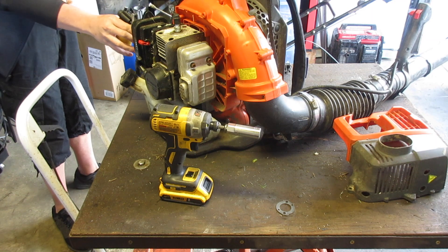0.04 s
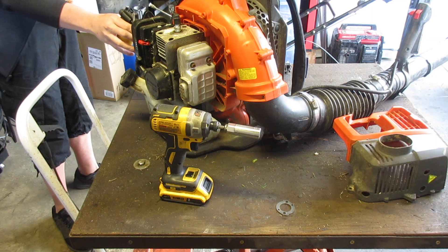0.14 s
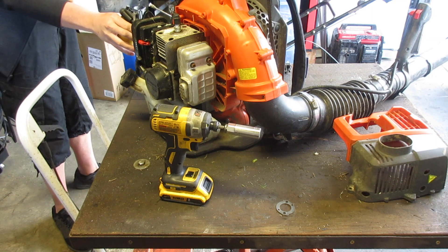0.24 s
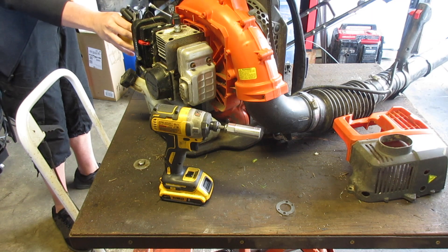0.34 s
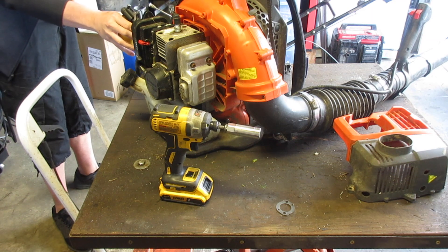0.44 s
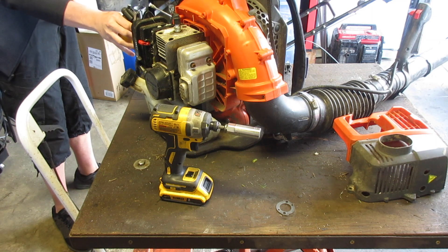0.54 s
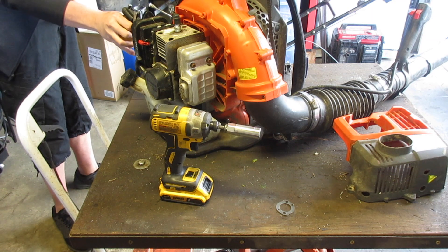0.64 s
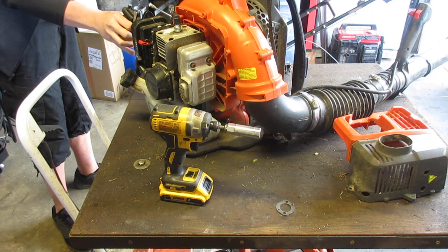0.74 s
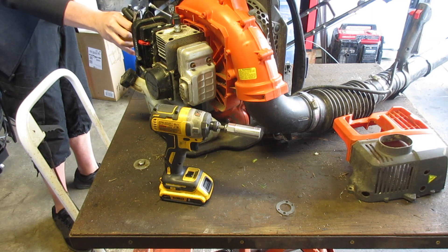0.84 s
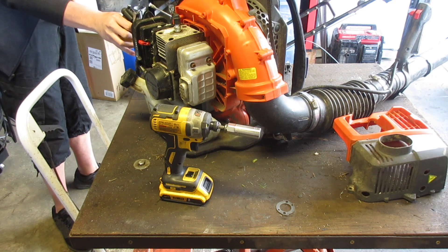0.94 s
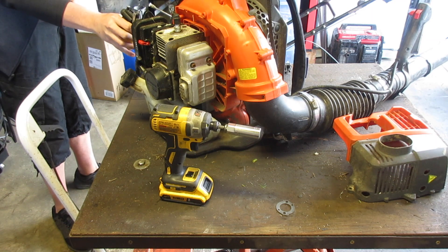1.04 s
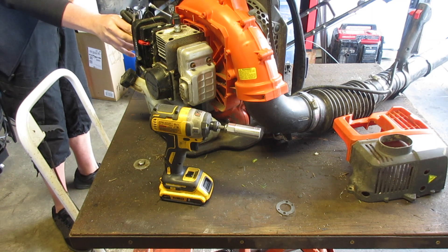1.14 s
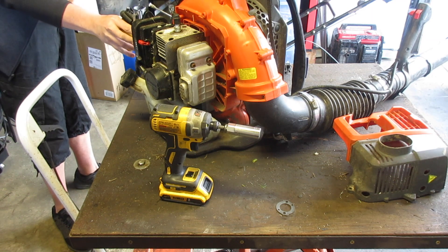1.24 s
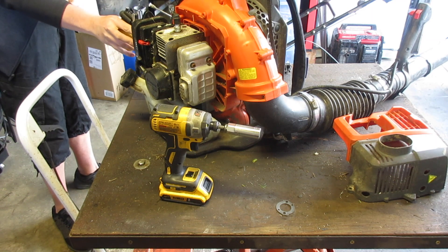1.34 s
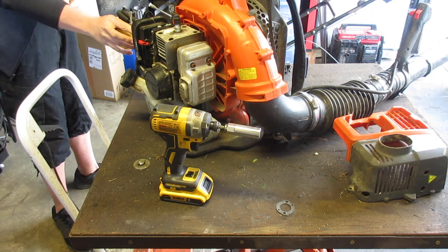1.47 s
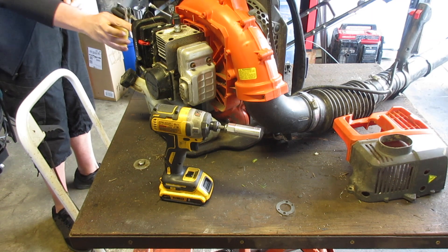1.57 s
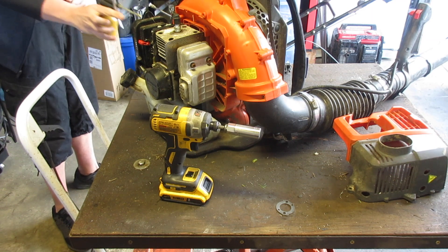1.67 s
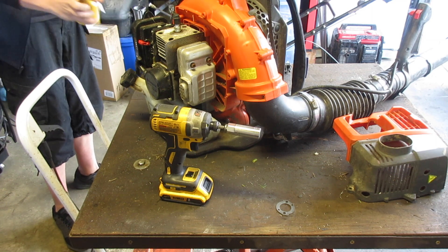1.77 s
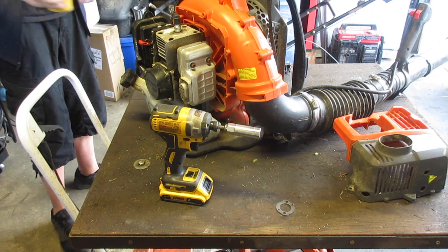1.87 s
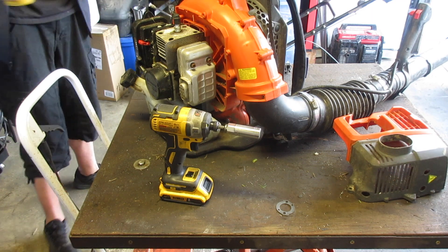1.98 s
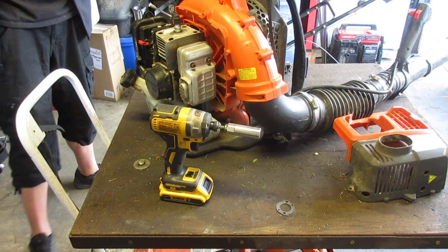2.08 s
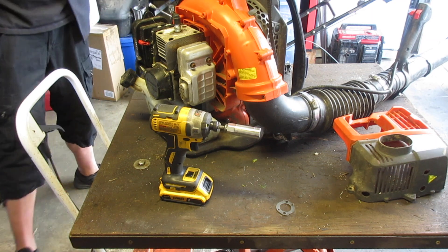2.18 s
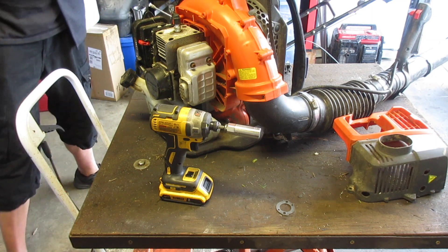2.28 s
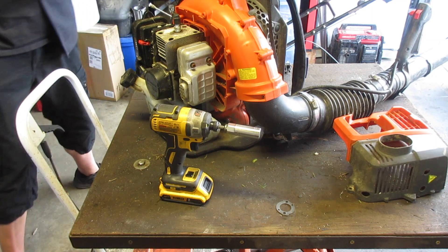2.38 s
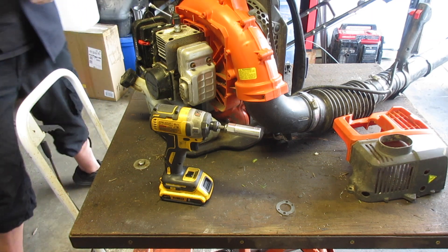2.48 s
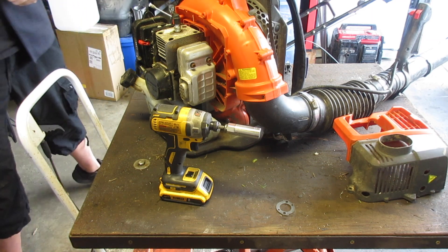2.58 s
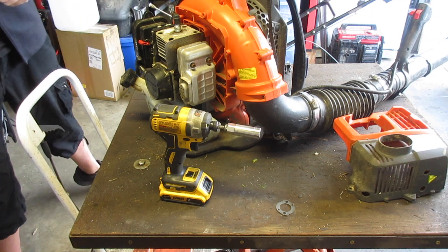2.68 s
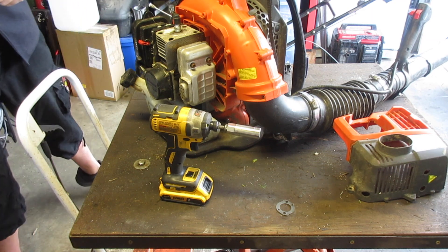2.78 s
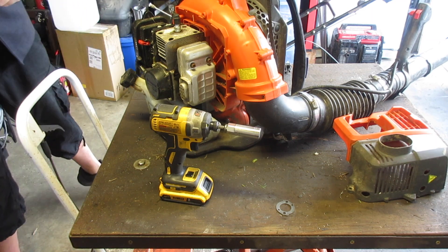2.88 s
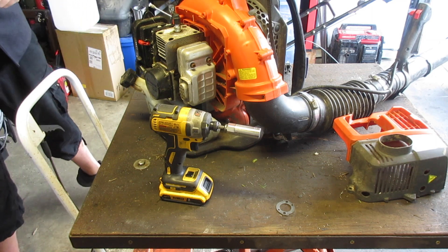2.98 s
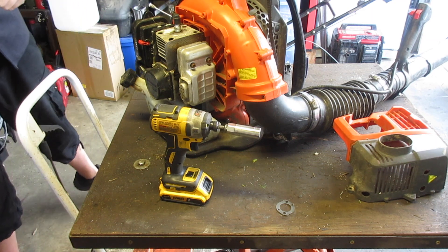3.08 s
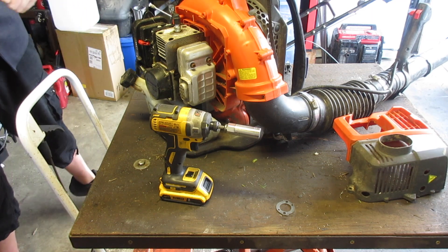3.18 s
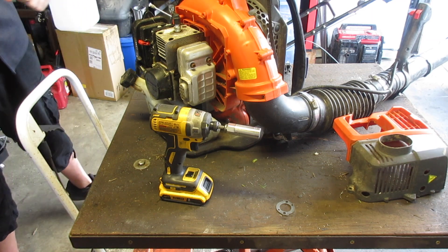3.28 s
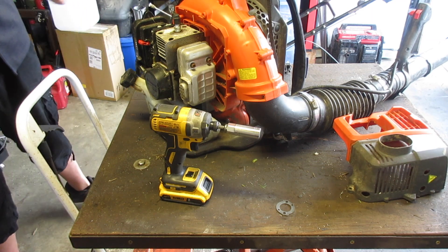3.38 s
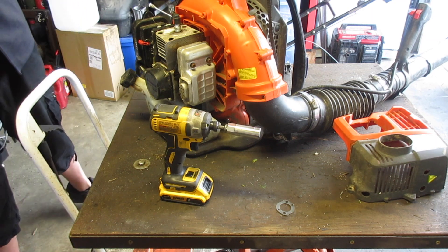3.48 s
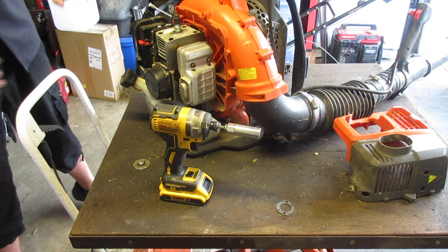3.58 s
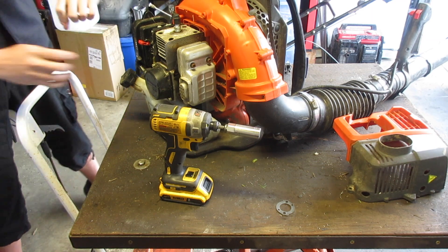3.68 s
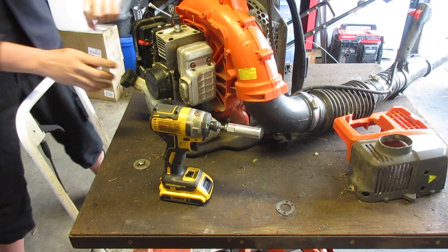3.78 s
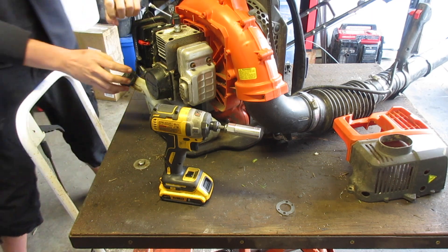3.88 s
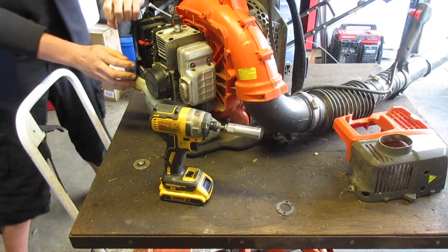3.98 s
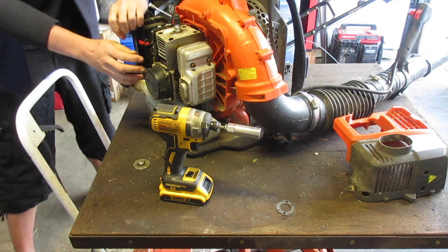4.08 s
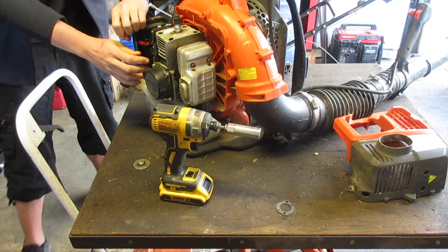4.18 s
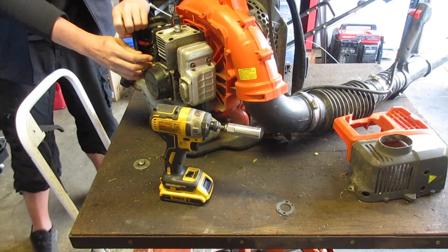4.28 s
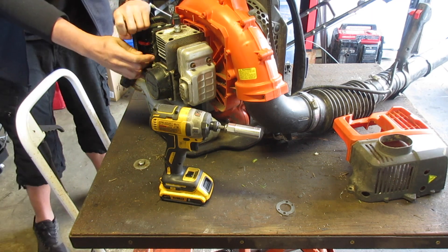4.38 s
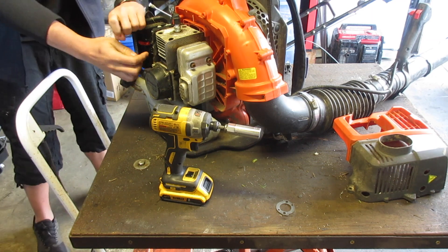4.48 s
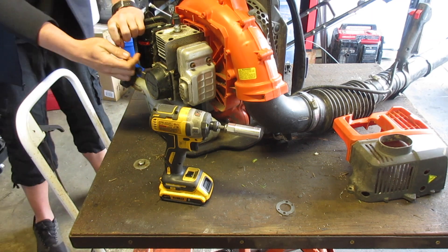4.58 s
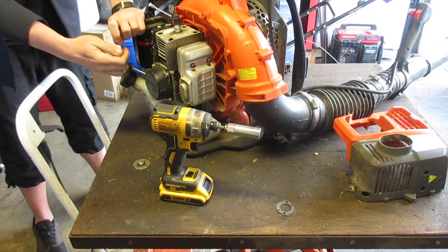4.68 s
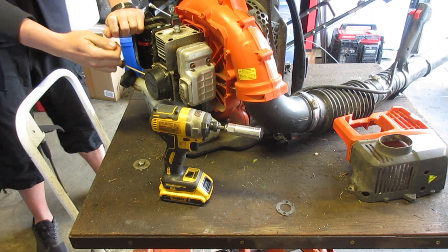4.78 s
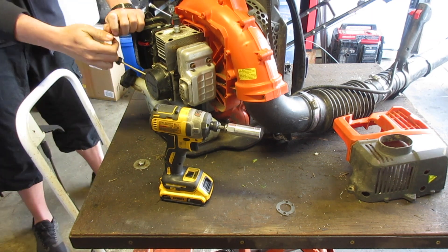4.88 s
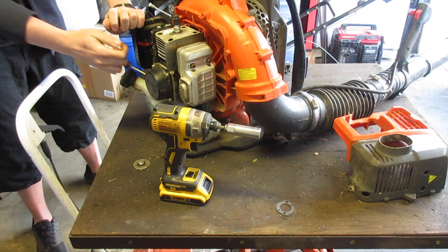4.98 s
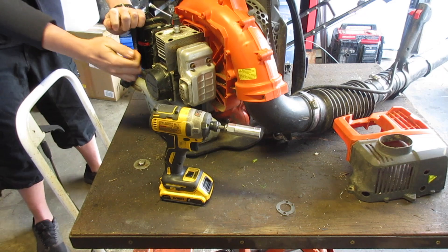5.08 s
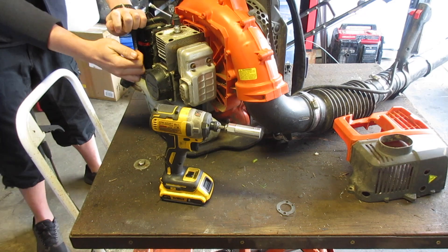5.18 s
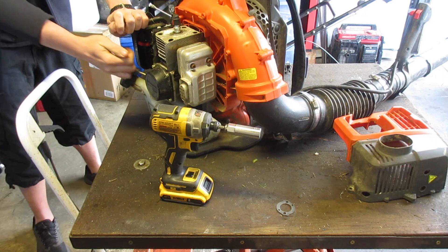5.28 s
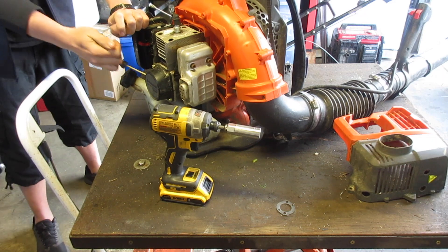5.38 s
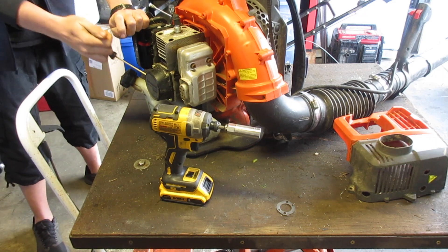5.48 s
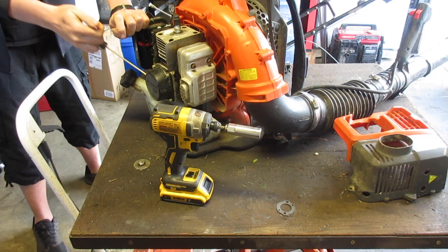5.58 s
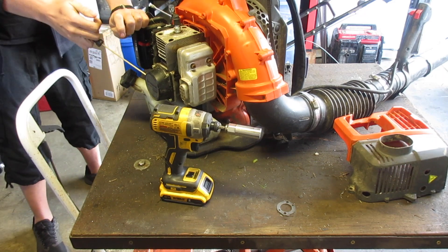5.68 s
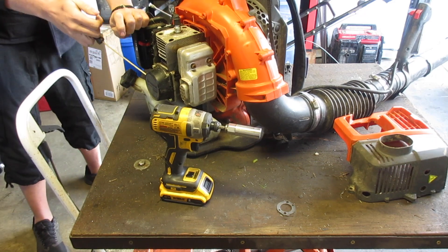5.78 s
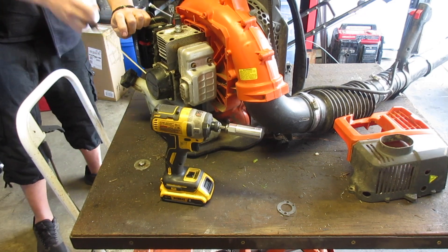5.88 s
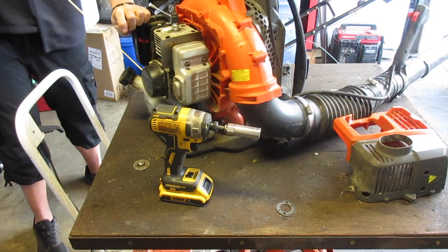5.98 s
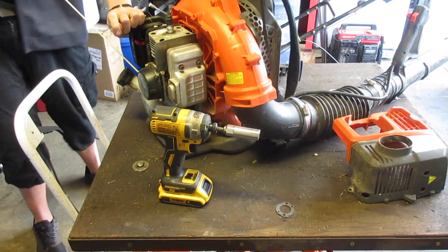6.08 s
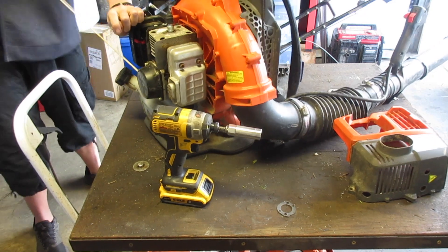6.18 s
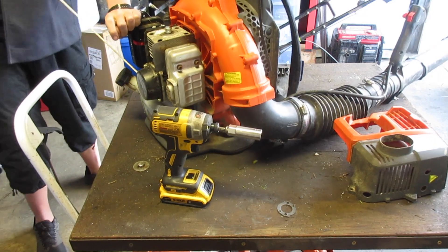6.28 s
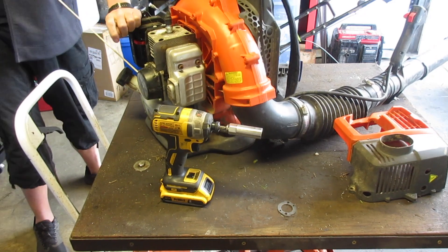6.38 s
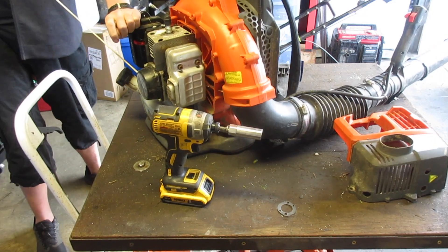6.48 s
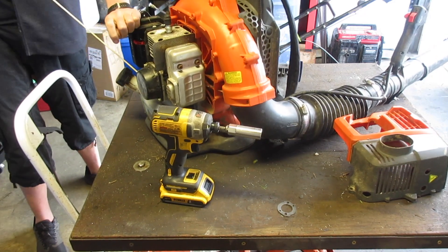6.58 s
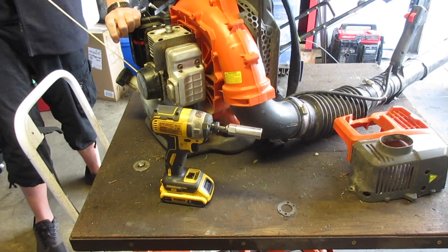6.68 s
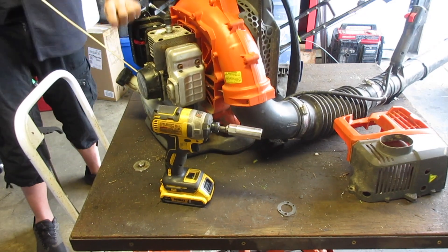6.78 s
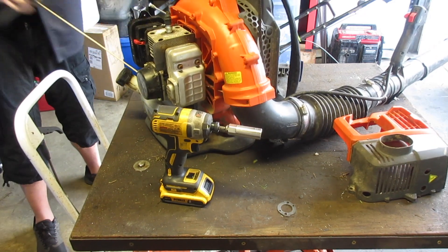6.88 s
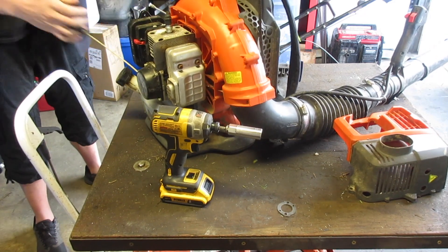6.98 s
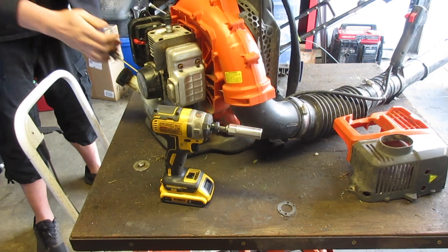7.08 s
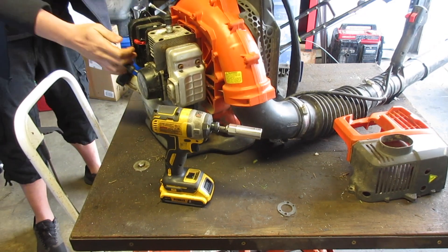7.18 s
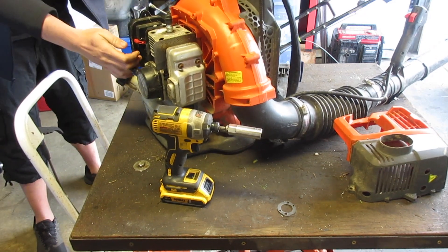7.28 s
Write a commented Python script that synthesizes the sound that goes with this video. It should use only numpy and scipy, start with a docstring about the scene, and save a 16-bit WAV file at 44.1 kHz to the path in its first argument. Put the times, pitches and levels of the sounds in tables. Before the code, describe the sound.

In a humming workshop, switches snap and something thuds before one starter cord pull turns a leaf blower engine, which fails to start.

```python
"""The small two-stroke engine of a backpack leaf blower is pulled over once but does not start.
On every turn it puffs air through its air box and muffler and its metal clatters; then it slows down.
Before the pull come snapping switches, a faint footstep and a hollow thud, and the starter cord rasps
out until the pawls (small hooks that grip the engine) catch. A steady hum fills the workshop."""
import sys
import numpy as np
from scipy import signal
from scipy.fft import rfft, irfft
from scipy.io import wavfile
from scipy.ndimage import uniform_filter1d

SR = 44100
rng = np.random.default_rng(int(sys.argv[2]) if len(sys.argv) > 2 else 0)


def store_pcm(level_fs):
    """Save levels as 16-bit WAV."""
    pcm = np.round(np.clip(level_fs, -1, 1) * 32767).astype(np.int16)
    wavfile.write(sys.argv[1], SR, np.atleast_2d(pcm).T)


N = 323694
TIME = np.arange(N) / SR
CATCH_S, FULL_SPEED = 5.955, 23   # when the pawls catch; engine turns per second

# plastic covers, whose short ring gives a dry crack: (pitch [Hz], width [Hz], level [dB])
COVER_MODES = [(306, 94, -7.5), (1160, 460, -1), (1720, 400, 2), (2390, 380, 3), (3460, 750, -5.5),
               (5150, 1460, -1), (6800, 3300, -9), (11400, 2600, -18.5)]


def engine():
    """The pulled engine pumps air through air box and muffler while its metal parts clatter."""
    # how fast the crankshaft spins: (time [s], speed [turns/s])
    crank_speed = [(5.955, 16.9), (6.1, 20.95), (6.22, 22.93), (6.42, 23.34), (6.55, 22.52), (6.75, 22.09),
                   (6.95, 19.29), (7.12, 15.13), (7.34, 9.78)]
    # puffs of air going in and coming out: (place in the turn [0-1], level [dB])
    intake_pulses = [(0.021, 3.5), (0.395, -1), (.72, 3)]
    exhaust_pulses = [(0.077, -3.5), (0.379, 7), (.84, 0)]
    # how air box, muffler and its thin steel shell ring: (pitch [Hz], width [Hz], level [dB])
    airbox_modes = [(69.4, 23, -13.5), (115, 19.6, -3.5), (163, 15.4, 2), (203, 30, 0.5), (242, 49, 4),
                    (298, 103, -3.5)]
    muffler_modes = [(333, 62, -1.5), (420.3, 29.4, 5.5), (446.5, 25.3, 4), (546, 51, -2), (628, 25, 6),
                     (659, 37, -2.5), (764, 29, -4.5), (884, 35, -6.5), (1010, 69, -7), (1286, 79, -5.5)]
    shell_modes = [(2241, 16, 9), (2416, 15, 20.5), (3100, 37, 8.5), (3130, 19, -3), (3530, 16, -5),
                   (3850, 20, -4), (4270, 26, -3), (7050, 45, -1), (11020, 25, -6)]
    # tone of the starter and piston clatter: (frequency [Hz], level [dB])
    clatter_colour = [(290, -45), (500, -10.5), (650, -2), (760, -9.5), (1120, -15.5), (1700, -8.5),
                      (2350, -11), (2750, -10.5), (3300, -11), (4300, -12.5), (5550, -19.5), (7400, -21),
                      (8500, -25.5), (12000, -29.5), (15300, -44)]

    speed = np.interp(TIME, *np.transpose(crank_speed))
    turns = np.cumsum(speed) / SR
    turns -= np.interp(CATCH_S, TIME, turns)   # count from the catch
    # the slower the crank, the harder the squeezed gas pushes back, up to a limit
    rebound_db = 14 * np.tanh(np.maximum(FULL_SPEED - speed, 0) / 2.3)
    intake = gas_pulses(turns, intake_pulses, rebound_db, uneven_db=3, jitter_s=0.00038)
    exhaust = gas_pulses(turns, exhaust_pulses, 0.29 * rebound_db, uneven_db=5.5, jitter_s=0.00042)

    thump = band(resonate(intake, airbox_modes), 45, 430)
    thump = even_out(room_dip(workshop(thump, reverb_db=-7)), window_s=0.21)
    thump *= follow_crank(speed, db=-25, db_per_doubling=3.8, build_up_s=0.018)
    puff = band(resonate(exhaust, muffler_modes), 358, 1430)
    puff = even_out(workshop(puff, reverb_db=-2.5), window_s=0.061)
    puff *= follow_crank(speed, db=-20.5, db_per_doubling=8.6, build_up_s=0.09)

    # the rattle is hardest at both ends of the piston's stroke, more so when the gas pushes back
    first_end = 0.82 * surge(turns, place=0.0081, fade_turns=0.24)
    second_end = 0.56 * amp(0.19 * rebound_db) * surge(turns, place=0.42, fade_turns=0.13)
    rattle = noise(clatter_colour) * (0.59 + first_end + second_end)
    rattle *= amp(2 * drift(740) + 1.2 * drift(220))   # fast flicker makes it rough
    rattle = rms_one(rattle) + 0.25 * rms_one(resonate(rattle, shell_modes))
    clatter = even_out(rattle, window_s=0.13)
    clatter *= follow_crank(speed, db=-20, db_per_doubling=6, build_up_s=0.018)
    return thump + puff + workshop(clatter, reverb_db=-8.5)


def gas_pulses(turns, pulses, rebound_db, uneven_db, jitter_s):
    """The engine's ports let gas through at the same points of every turn, a little unevenly."""
    out = np.zeros(N)
    for k, (place, db) in enumerate(pulses):
        timing, strength = rng.standard_normal((40, 2)).T
        at = np.searchsorted(turns, np.arange(40) + place) + (timing * jitter_s * SR).astype(int)
        in_scene = at < N - SR // 100
        at = at[in_scene]
        push_db = rebound_db[at] if k == 1 else 0   # only the middle pulse gets the push back
        out[at] += amp(db + uneven_db * strength[in_scene] + push_db)
    return out


def surge(turns, place, fade_turns):
    """Once a turn: a sudden rise, then a fade."""
    return np.exp(-((turns - place) % 1) / fade_turns)


def follow_crank(speed, db, db_per_doubling, build_up_s):
    """An engine sound builds up once the pawls catch, then rises and sinks with the speed."""
    caught = 1 - np.exp(-np.maximum(TIME - CATCH_S, 0) / build_up_s)
    return caught * amp(db + db_per_doubling * np.log2(speed / FULL_SPEED))


def starter():
    """Pawls and handle click on the casing and a spring pings; the pull brings hard, bright clacks."""
    # how the casing and the cord's rewind spring ring: (pitch [Hz], width [Hz], level [dB])
    casing_modes = [(617, 97, 12.5), (710, 110, 2.5), (900, 150, 0), (1278, 54, 8), (1480, 160, 3),
                    (1940, 280, 2), (2400, 51, -4), (2323, 23, 10.5), (3260, 85, -11.5), (3650, 320, -15),
                    (4600, 340, -6.5), (5540, 640, 0.5), (6250, 680, -2.5), (7220, 95, -0.5),
                    (7320, 140, -3), (9260, 1400, -28), (11220, 250, -14), (11000, 340, -9),
                    (13000, 660, -21)]
    spring_modes = [(5060, 41, 5), (6390, 79, -1), (6500, 43, 2), (7340, 70, -12)]
    # light touches on the casing: (time [s], click [dB], knock [dB], ting [dB])
    touch_hits = [(4.6783, -43, -45, -40.5), (4.7114, -52, -41.5, -64), (4.7422, -33.5, -44.5, -40),
                  (4.9906, -66, -33.5, -53), (5.021, -65, -35, -37), (5.0815, -39.5, -33, -41),
                  (5.1354, -69, -36.5, -64), (5.3464, -40, -32, -39), (5.3654, -44, -33, -62),
                  (5.3882, -29.5, -32.5, -29.5), (5.4884, -71, -38.5, -56), (5.6348, -32.5, -33.5, -50),
                  (5.9313, -30, -29, -31.5), (5.956, -24, -25, -32)]
    # clacks during the pull: (time [s], level [dB], brightness [dB])
    clack_hits = [(6.029, -13.5, -1.5), (6.0809, -15.5, -8.5), (6.1588, -21.5, -1), (6.1721, -16.5, -13),
                  (6.8698, -18.5, -8), (6.8836, -18.5, -7), (6.9846, -14.5, 3.5), (7.1055, -15, 1),
                  (7.249, -16, 0.5)]
    touches, clacks = np.zeros(N), np.zeros(N)
    for s, click_db, knock_db, ting_db in touch_hits:
        colour = [(650, knock_db), (1200, knock_db - 2.5), (2000, click_db), (3500, click_db),
                  (5500, ting_db + 0.5), (7300, ting_db + 2), (10000, ting_db - 13)]
        # a dull nudge touches for longer than a sharp click and makes the casing ring more
        dullness_db = np.clip(knock_db - click_db, 0, 18)
        contact_s = 0.0043 * amp(0.5 * dullness_db)
        casing = [(hz, width, db - 2.5 + 0.44 * dullness_db) for hz, width, db in casing_modes]
        level = np.linalg.norm(amp([knock_db, click_db, ting_db]))
        add(touches, s, level * strike(casing + COVER_MODES, colour, contact_s, grit=2.3))
    ping = strike(spring_modes, [(5000, 0), (7000, 0)], contact_s=0.002, grit=0.2, scatter_db=6)
    add(touches, 5.389, amp(-33.5) * ping)
    for s, db, bright_db in clack_hits:
        colour = [(700, -8), (2000, -0.3), (5000, -4.5), (8000, 11 + bright_db), (13000, 9.5 + bright_db)]
        clack = strike(casing_modes + COVER_MODES, colour, contact_s=0.0069, grit=6, scatter_db=3)
        add(clacks, s, amp(db) * clack)
    return workshop(band(touches, 210, 7000), reverb_db=-6.5) + workshop(clacks, reverb_db=-11.5)


def switches_and_footstep():
    """Plastic levers snap into place; the faint low knock at 2.308 s is a footstep."""
    # lever snaps and the footstep: (time [s], level [dB], contact time [s], knock [dB], mid tones [dB])
    hits = [(0.583, -35, 0.022, -5, 0), (.594, -27, 0.0074, -2, -3.5), (0.601, -29, 0.0067, -3, 1),
            (0.613, -35.5, 0.007, -6, -2), (1.5352, -37, 0.004, -1, 18), (1.547, -45, 0.023, -10, 15),
            (1.839, -56, .005, -10, 7), (2.308, -48, .008, 26, 0), (3.341, -50, 0.015, -7, 10),
            (3.86, -49.5, 0.018, -10, -10), (4.063, -53, 0.011, -8, -2)]
    # how the plastic rings, also used for the footstep: (pitch [Hz], width [Hz], level [dB])
    plastic_modes = [(374, 58, 6), (1110, 1400, -7.5), (1840, 440, -3), (2420, 320, 3), (3270, 860, -1),
                     (4300, 710, 1), (5660, 570, 0.5), (7100, 400, 1.5), (9300, 2700, -8.5),
                     (12500, 4000, -14)]
    out = np.zeros(N)
    for s, db, contact_s, knock_db, mid_db in hits:
        colour = [(400, knock_db), (1300, 0), (2400, mid_db), (6000, 0)]
        add(out, s, amp(db) * strike(plastic_modes, colour, contact_s, grit=5.5))
    return workshop(out, reverb_db=-4.5)


def thud():
    """Something hollow lands softly on two edges and settles, faintly shaking the plastic covers."""
    # each bump: (time [s], level [dB], contact time [s], brightness [dB])
    bumps = [(2.9662, -10, 0.001, 5), (2.975, -10, 0.0013, -4.5), (3.118, -38, .003, -29)]
    # how the hollow body rings: (pitch [Hz], width [Hz], level [dB])
    hollow_modes = [(109, 54, -15), (200, 36, 4), (382, 34, 7), (450, 78, 1), (524, 53, 5), (632, 53, 6.5),
                    (800, 125, -5), (910, 63, -5.5), (990, 55, -6), (1140, 130, -15.5)]
    # echoes off the walls: (delay [s], level [dB])
    wall_echoes = [(.029, -14), (.053, -31)]
    body, rattle = np.zeros(N), np.zeros(N)
    for s, db, contact_s, bright_db in bumps:
        bump = strike(hollow_modes, [(200, 0), (700, bright_db)], contact_s, grit=0.05, scatter_db=2.2)
        add(body, s, amp(db) * bump)
        shake = strike(COVER_MODES, [(4000, 0), (7000, -23)], contact_s=0.009, grit=4)
        add(rattle, s, amp(db - 39) * shake)
    direct = band(band(body, 50, 1600), 50, 1600) + rattle
    heard = workshop(direct, reverb_db=-13)
    for delay_s, db in wall_echoes:
        add(heard, delay_s, amp(db) * direct)
    return heard


def cord(rise_s=0.044, fade_s=0.026):
    """The starter cord rubs through its guide hole: each draw swells and dies away."""
    # draws of the cord: (start [s], length [s], level [dB])
    draws = [(4.023, 0.043, -46.5), (4.353, 0.078, -38.5), (4.552, 0.054, -55), (4.799, 0.055, -42),
             (4.986, .068, -43), (5.23, 0.093, -56), (5.889, 0.074, -36.5)]
    # tone of the rubbing: (frequency [Hz], level [dB])
    rasp_colour = [(760, -11), (1300, -9.5), (1700, -6.5), (2700, -4), (8370, -16.5), (15000, -32)]
    sliding = np.zeros(N)
    for s, length_s, db in draws:
        rise = np.clip((TIME - s) / rise_s, 0, 1)
        fade = np.exp(-np.maximum(TIME - s - length_s, 0) / fade_s)
        sliding += amp(db) * rise * fade
    rasp = noise(rasp_colour) * amp(2 * drift(400))
    return workshop(sliding * rasp, reverb_db=-6.5)


def workshop(x, reverb_db):
    """The room adds reverb, a wash of echoes in which low notes last longest."""
    # time the reverb takes to fall by 60 dB: (frequency [Hz], time [s])
    fade_times = [(100, 0.56), (250, 0.34), (700, 0.29), (2500, 0.29), (7000, 0.2), (15000, 0.18)]
    t = np.arange(SR // 2) / SR
    tail = 0
    for hz in 60 * 2.0 ** np.arange(8):
        octave = band(rng.standard_normal(len(t)), hz, 2 * hz)
        tail += octave * amp(-60 * t / at_hz(fade_times, hz * np.sqrt(2)))
    tail = rms_one(tail * (t > 0.004)) / np.sqrt(len(t))
    return x + amp(reverb_db) * signal.fftconvolve(x, tail)[:N]


def room_dip(x, hz=138.3, width_hz=25):
    """A standing wave in the room cancels a narrow band of bass at the microphone."""
    return signal.lfilter(*signal.iirnotch(hz, hz / width_hz, fs=SR), x)


def background():
    """Room air and the slightly wavering hum of a machine."""
    # tone of the air, and the notes of the hum: (frequency [Hz], level [dB])
    air_colour = [(20, -11), (45, -5.5), (100, -8.5), (190, -15), (270, -3.5), (350, -10), (462, -12),
                  (850, -14), (1960, -18.5), (3720, -27.5), (8320, -33), (14100, -41.5), (15300, -62)]
    hum_notes = [(24, -68), (30.5, -55.5), (60.8, -53), (122, -61), (152, -62), (246, -52), (296, -62.5),
                 (378, -70), (737, -67)]
    air = noise(air_colour)
    air = amp(-50.5) * air / np.std(band(air, 300, 15000))
    hum = 0
    for hz, db in hum_notes:
        level = np.sqrt(2) * amp(db + drift(8.1))
        hum += level * np.sin(2 * np.pi * hz * TIME + hz / 400 * drift(6))
    return air + hum


def strike(modes, colour, contact_s, grit, scatter_db=2):
    """A tap and a short gritty chatter make a body ring, each time as if hit at another spot."""
    t = np.arange(SR // 5) / SR
    chatter = rng.standard_normal(len(t)) * np.exp(-t / contact_s)
    force = grit * rms_one(chatter) + rms_one(t == 0)
    struck = [(hz, width, db + scatter_db * rng.standard_normal()) for hz, width, db in modes]
    return rms_one(resonate(force, struck, colour)) / np.sqrt(20)


def resonate(x, modes, colour=((1, 0), (2, 0))):
    """Ring a body's modes (its own notes); colour is a tone curve of (frequency [Hz], level [dB])."""
    out = 0
    for k, (hz, width, db) in enumerate(modes):
        decay = np.exp(-np.pi * width / SR)
        feedback = [1, -2 * decay * np.cos(2 * np.pi * hz / SR), decay ** 2]
        ringing = signal.lfilter([1, 0, -1], feedback, x + 1e-18)
        out += (-1) ** k * (1 - decay ** 2) / 2 * amp(db + at_hz(colour, hz)) * ringing
    return out


def even_out(x, window_s):
    """Take out slow changes of level and keep the beat."""
    count = int(window_s * SR)
    power = uniform_filter1d(uniform_filter1d(x * x, count), count // 2)
    return x / np.sqrt(np.maximum(power, 0) + power.max() / 1000)


def noise(colour):
    """Noise shaped by a tone curve."""
    gains = amp(at_hz(colour, np.arange(N // 2 + 1) * SR / N))
    return rms_one(irfft(rfft(rng.standard_normal(N)) * gains, N))


def drift(rate):
    """A random wobble that heads for a new value `rate` times a second."""
    values = rng.standard_normal(4096)
    return np.interp(TIME * rate, np.arange(len(values)), values)


def band(x, low_hz, high_hz):
    """Keep the sound between two frequencies."""
    return signal.sosfilt(signal.butter(2, [low_hz, high_hz], "band", fs=SR, output="sos"), x)


def at_hz(points, hz):
    """Read between a table's rows, with octaves evenly spaced."""
    frequencies, values = np.transpose(points)
    return np.interp(np.log(np.maximum(hz, 1)), np.log(frequencies), values)


def amp(db):
    """Turn decibels into a gain."""
    return 10 ** (np.asarray(db) / 20)


def rms_one(x):
    """Scale to an average (rms) level of 1."""
    return x / np.sqrt(np.mean(x ** 2) + 1e-20)


def add(track, s, sound):
    """Mix a sound in at s seconds."""
    start = int(s * SR)
    track[start:start + len(sound)] += sound[:N - start]


def scene():
    """All sources at one microphone."""
    return (engine() + starter() + switches_and_footstep() + thud() + cord() + background())[None]


def record(dry):
    """Round off the peaks and cut the highest treble."""
    rounded = 1.508 * np.tanh(dry / 1.484)
    return signal.sosfilt(signal.ellip(12, 0.2, 80, 15400, fs=SR, output="sos"), rounded)


dry = scene()
out = record(dry)
store_pcm(out)
```